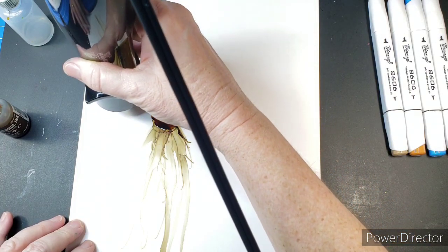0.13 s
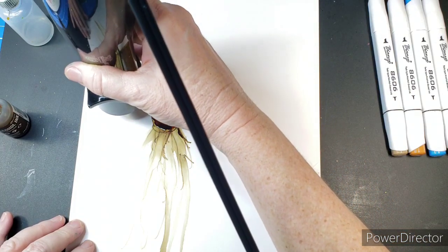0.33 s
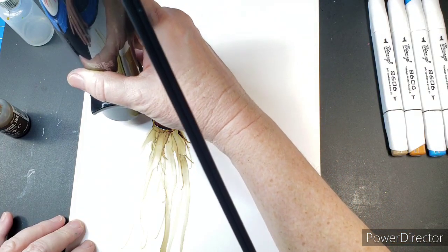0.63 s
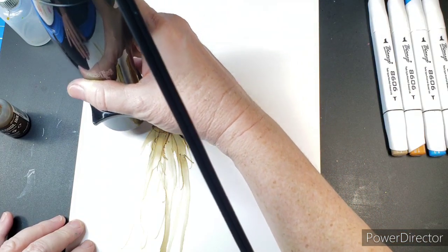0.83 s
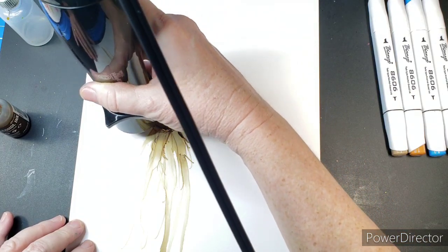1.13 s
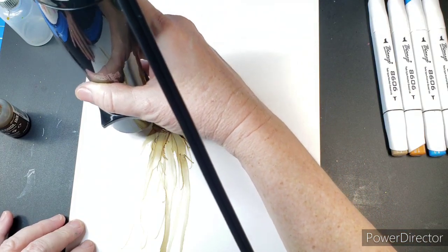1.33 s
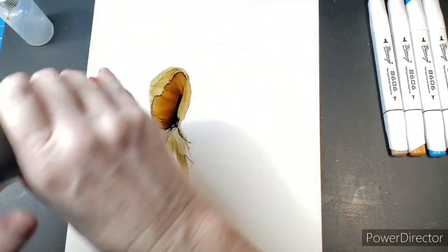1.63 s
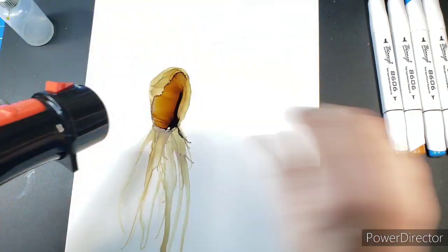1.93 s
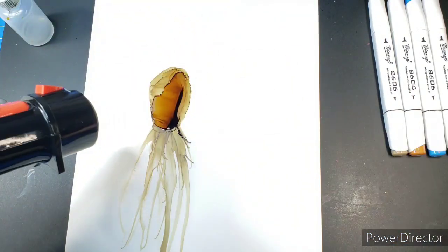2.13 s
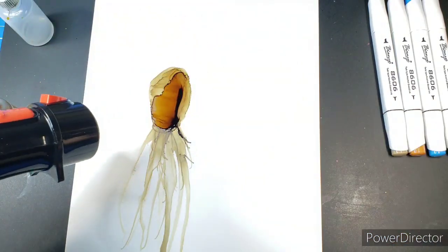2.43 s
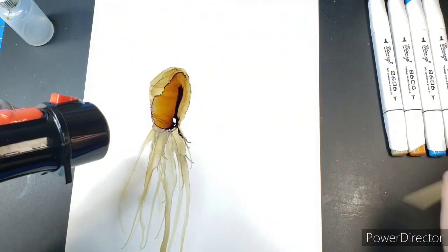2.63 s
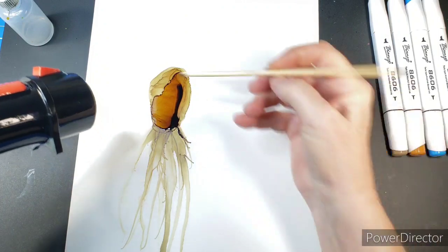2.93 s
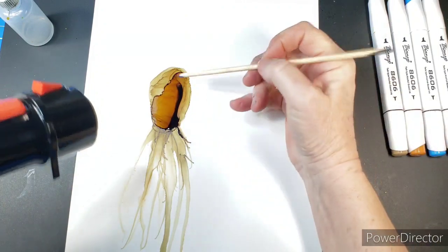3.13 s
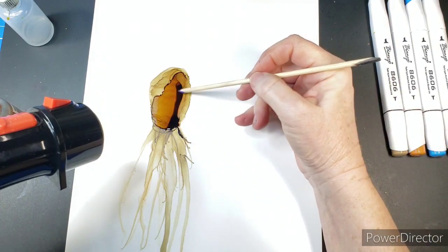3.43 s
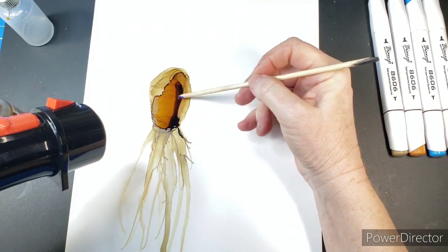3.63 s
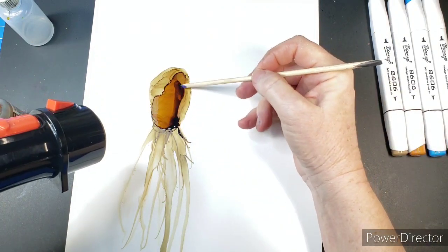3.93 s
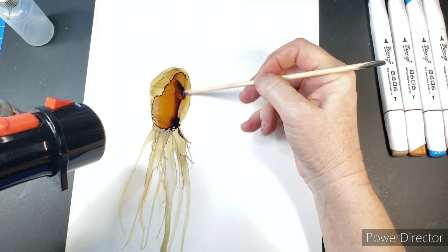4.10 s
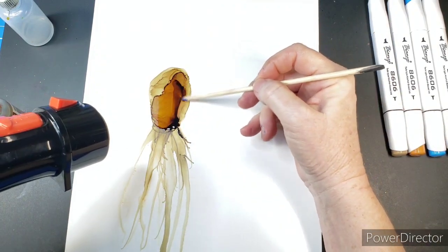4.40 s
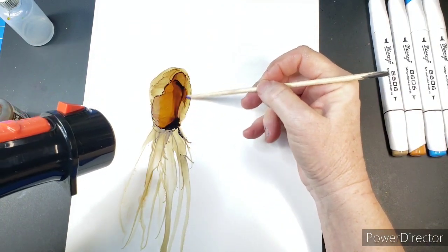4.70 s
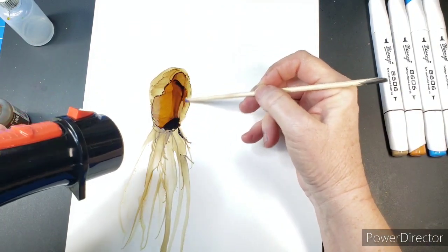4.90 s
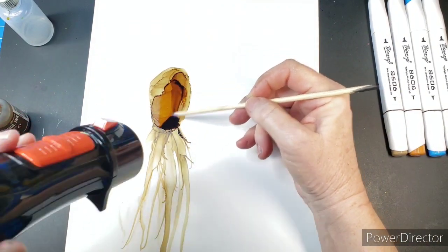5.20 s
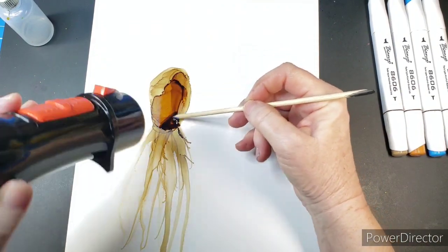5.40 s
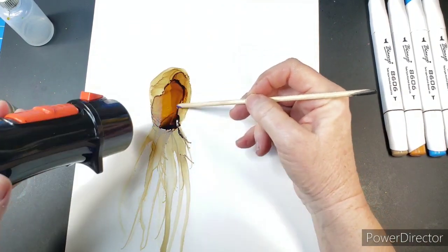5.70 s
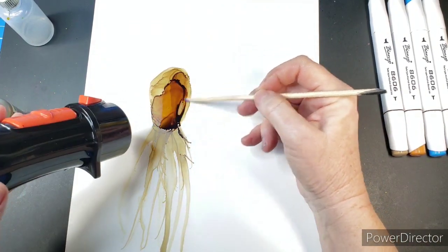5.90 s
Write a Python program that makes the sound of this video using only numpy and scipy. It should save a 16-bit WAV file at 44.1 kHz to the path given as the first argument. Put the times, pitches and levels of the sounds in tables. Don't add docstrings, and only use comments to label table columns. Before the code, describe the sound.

Constant close rush of air and motor whine from a compact blow dryer, shifting tone as it turns, with a thin stick clicking once.

```python
import sys
import numpy as np
from scipy import signal
from scipy.fft import rfft, irfft
from scipy.io import wavfile
from scipy.ndimage import uniform_filter1d, map_coordinates

SR = 44100
rng = np.random.default_rng(int(sys.argv[2]) if len(sys.argv) > 2 else 0)


def boost(x):
    u = np.asarray(x, float) / 20
    return 10 ** u


def wrap_up_sound(samples):
    columns = np.atleast_2d(samples).T
    tamed = np.clip(columns, -1, 1)
    steps = np.round(tamed * 32767).astype(np.int16)
    wavfile.write(sys.argv[1], SR, steps)


N = 266849
T = np.arange(N) / SR
F = np.fft.rfftfreq(N, 1 / SR)
SIDES = np.array([[1], [-1]])

# (time [s], share of the across pose [0-1])
TURN = [(1.5, 0), (1.78, 1)]
# (time [s], level [dB])
FACING = [(0, 3.5), (.35, 4.5), (1.25, 4), (1.64, 6), (1.77, 2.5), (2.16, -0.5), (3.08, -1), (3.3, 0.5),
          (4.7, .5), (5.13, 2.5), (5.38, 4.5), (5.5, 1), (6.05, 0.5)]
# (time [s], lag of the right port [ms])
INLET = [(0, .2), (1.5, .225), (1.68, .325), (1.78, .315), (1.9, .37), (2.3, .35), (4.9, .355), (5.08, .39),
         (5.35, .305), (5.6, .335), (6.05, .33)]
# (time [s], length [s], direct over scattered sound [dB])
LIFTS = [
    (1.62, .15, 7),
    (5.12, .28, 6),
]
# (frequency [Hz], left level [dB], right level [dB])
RUSH_DOWN = [(40, -77, -81), (107, -89, -81.5), (250, -80.5, -82.5), (550, -75, -75.5), (734, -82, -74.5),
             (1270, -80, -80), (1960, -69, -72.5), (2800, -81, -75), (3330, -79.5, -80), (5860, -77.5, -79),
             (9100, -78, -81), (11500, -74.5, -78), (13500, -77, -88), (15000, -74.5, -85)]
RUSH_ACROSS = [(40, -104, -84), (110, -83.5, -85.5), (243, -82, -81.5), (480, -78, -79),
               (642, -74.5, -72.5), (1220, -78, -74.5), (1900, -73.5, -74), (3380, -78, -74),
               (4250, -78.5, -76.5), (5830, -77, -78.5), (9250, -79, -80.5), (10800, -75.5, -77),
               (13300, -78, -82), (15300, -75.5, -86)]
# (frequency [Hz], pointing down [0-1], across [0-1])
COHERENCE = [(60, 0.98, 0.89), (530, 0.99, 1), (690, 0.68, 0.22), (1300, 0.34, 0.37), (2080, 0.19, 0),
             (2800, 0.98, 0.63), (3440, 0.35, 0.05), (4500, 0.53, 0.1), (5840, 0.13, 0.05),
             (7900, 0.13, 0.2), (15000, 0.5, 0.16)]
# (frequency [Hz], width [Hz], left [dB], right [dB], left leads [rad])
RING_DOWN = [(300, 40, -79, -80, .2), (419, 12, -72, -71, .2), (880, 110, -58, -65, 1.8),
             (800, 60, -61.5, -63, 2), (1000, 120, -66.5, -69, .6), (1594, 350, -72.5, -73.5, 1.9),
             (2330, 104, -72, -78, 3.6), (11600, 300, -78, -77, 2)]
RING_ACROSS = [(302, 42, -79, -79, .1), (415, 28, -75, -74.5, .3), (525, 46, -79, -78, .5),
               (790, 80, -65, -68.5, 2.8), (865, 90, -59.5, -63.5, 2.7), (855, 30, -62, -67, 1.8),
               (950, 120, -66.5, -70, 2.8), (1060, 120, -69, -73, 2), (1740, 200, -78, -78, 2.6),
               (2340, 200, -76, -83, 4), (12100, 620, -99, -84, 1.5)]
WHISTLE = [(7360, 860, -79.5, -106, -1.1), (7400, 48, -96, -89, -.6), (7880, 86, -95, -81, -0.55)]
JET = [(2850, 850, -77, -77.3, 3.14)]
SWING = [(1658, 13, -53, -58, .3), (1490, 440, -79, -79, 1.2)]
# (time [s], length [s], first frequency [Hz], last frequency [Hz], share [0-1])
HALF_WAVE_BANDS = [(0, 1.58, 2840, 2880, .5), (0, 1.45, 6550, 6550, .4), (1.42, .12, 6700, 6500, .95),
                   (1.54, .11, 5600, 5300, .95), (1.6, .1, 4700, 4500, .9), (1.76, .12, 4200, 4450, .7),
                   (1.88, .1, 4100, 4050, .8), (1.71, .1, 7950, 7850, .95), (2.2, 2.2, 4420, 4430, .62),
                   (2.3, 3, 2780, 2920, .5), (2.94, .1, 4100, 4000, .9), (3.0, .12, 3300, 3300, .85),
                   (3.5, 2, 3640, 3660, .6), (4.62, .33, 4450, 4350, .85), (5.01, .11, 4050, 3950, .9),
                   (5.18, .12, 4150, 4400, .9), (5.3, .12, 4950, 4950, 1), (5.43, .12, 4250, 4000, .9),
                   (5.55, .5, 4420, 4520, .62), (5.5, .55, 2550, 2500, .45)]
# (time [s], revolutions [Hz])
SHAFT = [(0, 166.5), (.4, 166.7), (1.4, 166.95), (1.75, 165.85), (2.1, 165.4), (3.4, 165.4), (3.85, 165.9),
         (5.3, 166.65), (6.05, 166.65)]
# (multiple of shaft speed, level down [dB], across [dB], left minus right [dB], left leads [rad])
WHINE = [(7, -58, -48, 7, 2.3), (9, -58.5, -56, 1, 2.1), (10, -55.5, -53.5, 5, 1.9),
         (30, -69.5, -68, -2, -1.3), (1, -69, -70, 0, .3), (8, -64, -68, 1, 2.3), (14, -57, -62, 6, -2.6),
         (15, -63, -64, 0, -2.8), (20, -64, -69, 0, 2.3), (23, -72, -58, -5, 3), (47, -71, -60, 4, -.5)]
WITH_SPEED = {9: -3, 47: -3, 10: 3, 8: 3, 15: 3, 20: 5, 23: -5}
# (time [s], level [dB])
HUM = [(0.0, -70), (0.15, -53), (0.29, -63.5), (1.75, -59.5), (2.16, -71), (2.34, -57.5), (3.22, -68.5),
       (3.62, -62), (3.67, -73), (3.76, -54.5), (4.23, -68), (4.26, -57), (4.5, -67), (5.24, -57.5),
       (5.29, -66), (5.69, -61), (5.81, -79), (6.05, -58)]
# (time [s], peak level [dB], left minus right [dB])
TICKS = [
    (.851, -38, 3),
    (.857, -40, 2),
    (2.238, -27, 2),
    (2.244, -32, 0),
    (2.4184, -6.5, -9),
    (2.4197, -10.5, -9),
    (2.4213, -20, -3),
    (2.4235, -24, 1),
    (2.429, -27, 3),
]
# (frequency [Hz], level [dB], t60 [s])
TICK_MODES = [(5500, -23, .02), (6930, -21, .025), (8010, -17, .035), (10700, -8, .022), (12500, -9, .015),
              (13400, 1, .014), (13840, 1, .02), (14800, -3, .014)]
# (time [s], peak level [dB])
BUMPS = [
    (2.231, -28),
    (2.413, -33),
]
# (frequency [Hz], level [dB], t60 [s])
DESK = [(110, -5, .08), (180, -5, .06), (290, -3, .06), (410, 0, .11), (600, -9, .05), (850, -2, .08)]
# (time [s], length [s], frequency [Hz], width [Hz], level [dB per Hz])
HOLLOWS = [
    (2.097, 1.37, 1977, 218, -79.5),
    (3.004, 0.38, 1720, 220, -75),
    (3.35, 3.4, 635, 160, -76),
    (5.4, .8, 730, 120, -84),
]


def columns(table, at, warp=np.asarray):
    first, *rest = np.transpose(table)
    return [np.interp(warp(at), warp(first), c) for c in rest]


def noise():
    return rfft(rng.standard_normal(N)) * np.sqrt(SR / 2)


def walk(rate):
    hold = int(SR / rate)
    steps = np.repeat(rng.standard_normal(N // hold + 1), hold)
    return 1.272 * uniform_filter1d(uniform_filter1d(steps, hold), hold)[:N]


def add(out, s, sound):
    i = int(s * SR)
    out[i:i + len(sound)] += sound[:N - i]


def delayed(x, ms):
    return map_coordinates(x, [np.arange(N) - ms * SR / 1000], order=3, mode="nearest")


def ports(gains, alike, lead):
    shared, alike = noise(), np.clip(alike, 0, .995)
    left, right = gains
    right_shared = right * alike * np.exp(-1j * lead) * shared
    right_scattered = right * np.sqrt(1 - alike ** 2) * noise()
    return irfft([left * shared, right_shared, right_scattered], N)


def echoes(db, latest_ms):
    paths = [np.exp(-2j * np.pi * F * latest_ms / 1000 * late) for late in rng.random(10)]
    ripple = np.abs([1 + boost(db) * sum(paths[:7]), 1 + boost(db) * sum(paths[2:9])])
    return ripple / np.sqrt(1 + 7 * boost(2 * db))


def rush(table, alike):
    gains = boost(np.array(columns(table, F + 1, np.log))) / np.sqrt(1 + (50 / (F + 1)) ** 8)
    gains = gains * echoes(db=-17, latest_ms=14)
    low = 1 / (1 + (F / 650) ** 8)
    top = 1 / (1 + (8500 / (F + 1)) ** 6)
    parts = [(low, F / 1400), (1 - low - top, 0), (top, 0)]
    return [ports(gains * np.sqrt(np.abs(part)), alike, lead) for part, lead in parts]


def rings(modes, alike, flicker_db):
    out = 0
    for hz, width, left_db, right_db, lead in modes:
        shape = 1 / (1 + ((F - hz) / width * 1.8) ** 2)
        gains = [shape * boost(left_db), shape * boost(right_db)]
        out = out + ports(gains, alike, lead) * boost(flicker_db * walk(4.84))
    return out


def lifts():
    return sum(db * np.exp(-((T - s) / length) ** 2) for s, length, db in LIFTS)


def air(facing_db, roar_db):
    across, = columns(TURN, T)
    inlet_ms, = columns(INLET, T)
    hiss_db = -55 + facing_db
    whistle_db = -53 - 0.4 * facing_db
    nozzle = across * np.clip(0.87 - 0.2 * facing_db, 0, 1)
    direct_db = across + lifts()
    fixed = np.sqrt(across) * boost(whistle_db + 55) * rings(WHISTLE, alike=0.29, flicker_db=-1.0)
    jet_share = np.sqrt(np.clip(1 - 3 * across, 0, 1))
    fixed = fixed + jet_share * boost(.7 * (facing_db - 4.5)) * rings(JET, alike=.985, flicker_db=.5)
    fixed = fixed + 4 * across * (1 - across) * rings(SWING, alike=0.8, flicker_db=1.5)
    moving = 0
    poses = [(1 - across, RUSH_DOWN, RING_DOWN, 47, 43), (across, RUSH_ACROSS, RING_ACROSS, 49, 46)]
    for (share, table, modes, hiss_ref, roar_ref), alike in zip(poses, columns(COHERENCE, F + 1, np.log)):
        low, body, top = rush(table, alike)
        roar = rings(modes, alike=0.92, flicker_db=1.1) * boost(0.55 * (roar_db + roar_ref))
        fixed = fixed + np.sqrt(share) * (low + roar)
        body = body * boost(0.85 * (hiss_db + hiss_ref))
        top = top * boost(hiss_db + hiss_ref + 0.26 * walk(17))
        moving = moving + np.sqrt(share) * (body + top)
    from_inlet = np.sqrt(1 - nozzle) * delayed(moving[1], inlet_ms)
    from_nozzle = np.sqrt(nozzle) * delayed(moving[1], .12)
    direct = (from_inlet + from_nozzle) * boost(.4 * direct_db)
    scattered = moving[2] * boost(-direct_db)
    return np.array([fixed[0] + moving[0], fixed[1] + fixed[2] + scattered + direct])


def opposed(blown):
    right, tremble, drift = blown[1].copy(), .17 * walk(11), 1 + .012 * walk(6)
    relative_width, fade_s = .07, .02
    for s, length, first_hz, last_hz, share in HALF_WAVE_BANDS:
        span = slice(int(s * SR), int((s + length) * SR))
        both = blown[0, span] + blown[1, span]
        t = T[:len(both)]
        hz = (first_hz + (last_hz - first_hz) * t / length) * drift[span]
        turn = np.exp(2j * np.pi * np.cumsum(hz) / SR)
        share = np.clip(share + min(length, .5) * 2 * tremble[span], 0, 1)
        lowpass = signal.butter(2, relative_width * first_hz / 2, fs=SR, output="sos")
        slow = signal.sosfiltfilt(lowpass, both / turn)
        fade = np.clip(np.minimum(t, length - t) / fade_s, 0, 1)
        right[span] -= share * fade * 2 * (slow * turn).real
    return np.array([blown[0], right])


def motor(facing_db):
    (hz,), (across,) = columns(SHAFT, T), columns(TURN, T)
    turn = 2 * np.pi * np.cumsum(hz * (1 + 0.00121 * walk(7))) / SR
    out = 0
    for order, down_db, across_db, pan_db, lead in WHINE:
        db = down_db + across * (across_db - down_db)
        db = db + (order == 30) * 2.5 * facing_db
        db = db + across * WITH_SPEED.get(order, 0) * (hz - hz.min())
        level = np.sqrt(2) * boost(db + .8 * walk(6) + 1.5 * walk(1.5) + SIDES * pan_db / 2)
        out = out + level * np.sin(round(order) * turn + SIDES * lead / 2)
    return out


def hum(db):
    phase = 2 * np.pi * 59.8 * T + .5 * walk(4.35)
    level = boost(db + 3.5 + 1.3 * walk(18) - 3.1 * SIDES)
    return level * (np.sin(phase) + boost(-9.0) * np.sin(2 * phase))


def struck_modes(modes, t, damp):
    out = 0
    for hz, db, t60 in modes:
        out = out + boost(db - 60 * t / (t60 * damp)) * np.sin(2 * np.pi * (hz * t + rng.random() / 5))
    return out


def stick():
    out, t = np.zeros((2, N)), T[:SR // 8]
    bright = signal.butter(2, 8500, "high", fs=SR, output="sos")
    for s, db, pan_db in TICKS:
        for side, late_s in enumerate((.0003, 0)):
            hiss = signal.sosfilt(bright, rng.standard_normal(len(t)))
            crack = hiss * (.25 * boost(-60 * t / .012) + boost(-24 - 60 * t / .16))
            tick = np.minimum(t / .0004, 1) * (.4 * struck_modes(TICK_MODES, t, damp=.5) + crack)
            add(out[side], s + late_s, tick * boost(db + pan_db * (0.5 - side)))
    for s, db in BUMPS:
        bump = np.minimum(t / .004, 1) * struck_modes(DESK, t, damp=1) * boost(db) / 2
        for side in out:
            add(side, s, bump)
    return out


def hollow(s, length, hz, width_hz, db, lead, fade_s):
    t, out = T[:int(length * SR)], np.zeros((2, N))
    lowpass = signal.butter(2, width_hz / 2, fs=SR, output="sos")
    slow = signal.sosfilt(lowpass, rng.standard_normal((len(t), 2)) @ [1, 1j])
    turn = 2 * np.pi * np.cumsum(np.full(len(t), hz)) / SR
    fade = np.clip(np.minimum(t, length - t) / fade_s, 0, 1)
    band = slow * np.exp(1j * turn) * fade * np.sqrt(SR) * boost(db)
    add(out[0], s, (band * np.exp(1j * lead)).real)
    add(out[1], s, band.real)
    return out


def hollows():
    out = 0
    for s, length, hz, width_hz, db in HOLLOWS:
        lead = hz / 1400 * (hz < 700) + np.pi * (700 < hz < 900)
        out = out + hollow(s, length, hz, width_hz, db, lead, fade_s=.15)
    return out


def scene():
    facing_db, = columns(FACING, T)
    turned_s = TURN[0][0]
    roar_db = np.where(T < turned_s, -40.5 - 4.5 * T, -40.5 - 0.53 * (T - turned_s))
    blown = air(facing_db, uniform_filter1d(roar_db, SR // 5))
    hum_db = columns(HUM, T)[0] - 1.5 + 1.4 * walk(6)
    return opposed(blown) + motor(facing_db) + hum(hum_db) + stick() + hollows()


def band_limit(x):
    return signal.sosfilt(signal.butter(12, 16830, fs=SR, output="sos"), x)


def record(dry):
    lowpass = signal.ellip(10, .3, 70, 15560, fs=SR, output="sos")
    mix = signal.sosfilt(lowpass, dry)
    return band_limit(mix)


dry = scene()
out = record(dry)
wrap_up_sound(out)
```